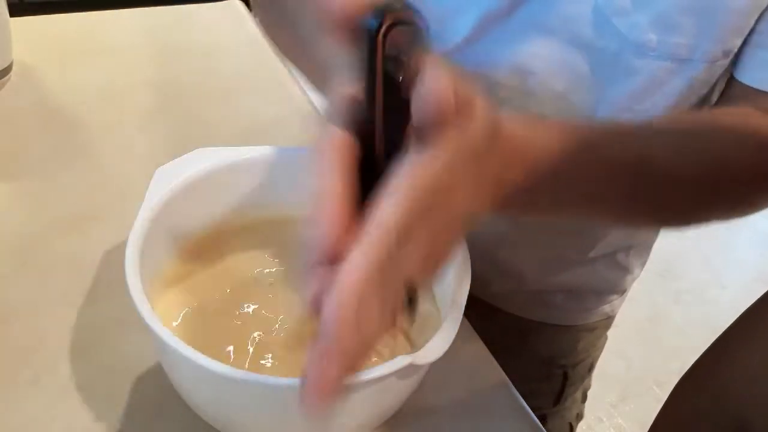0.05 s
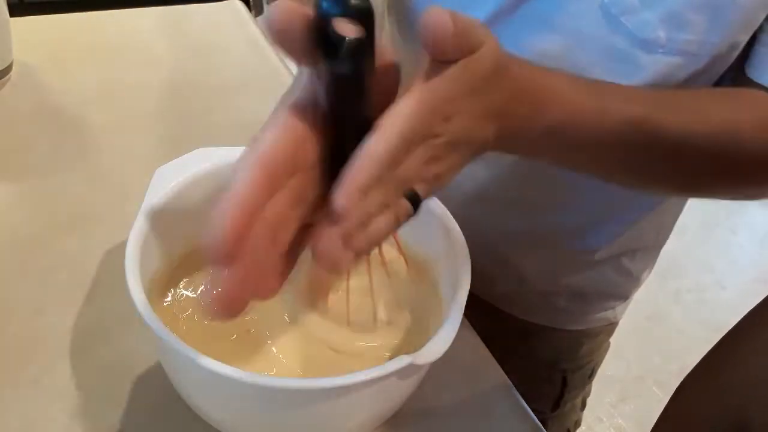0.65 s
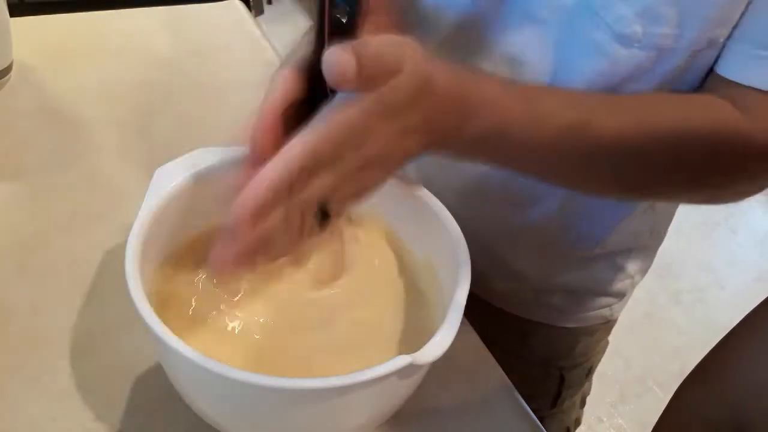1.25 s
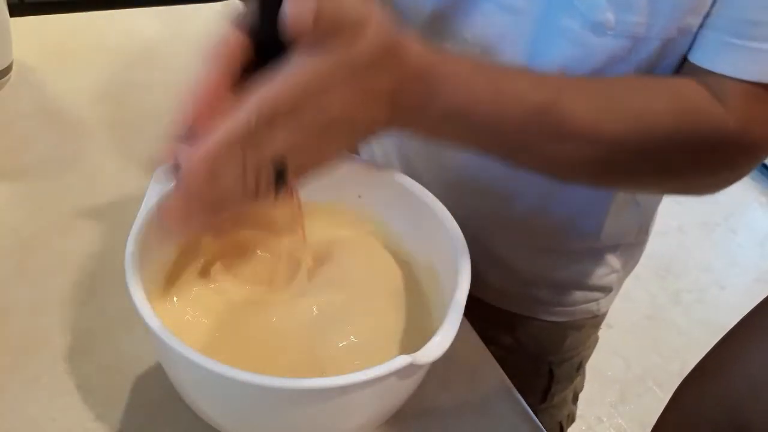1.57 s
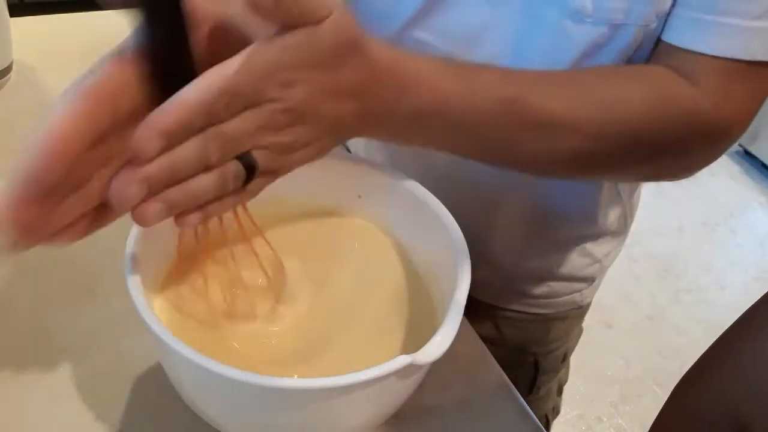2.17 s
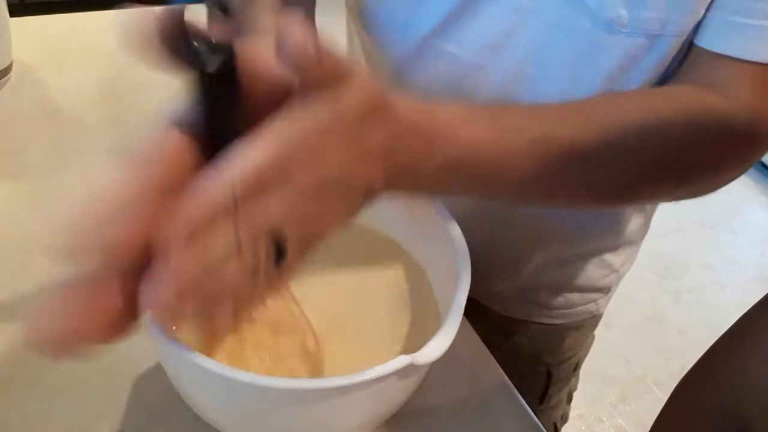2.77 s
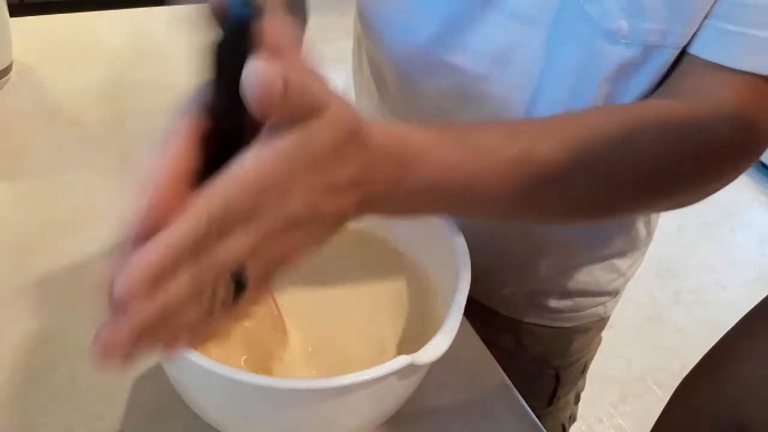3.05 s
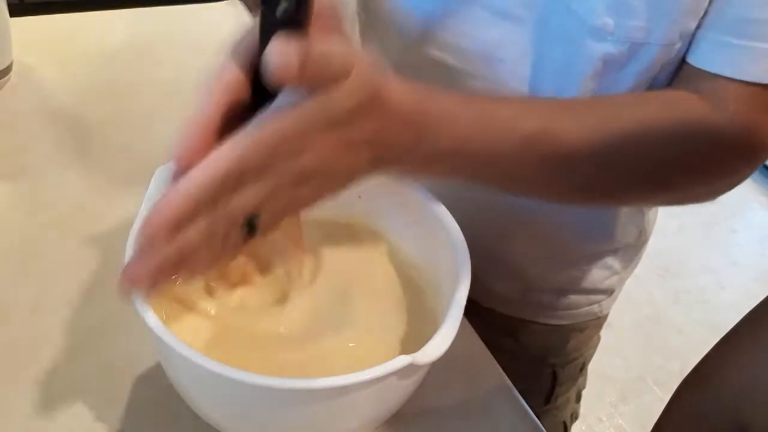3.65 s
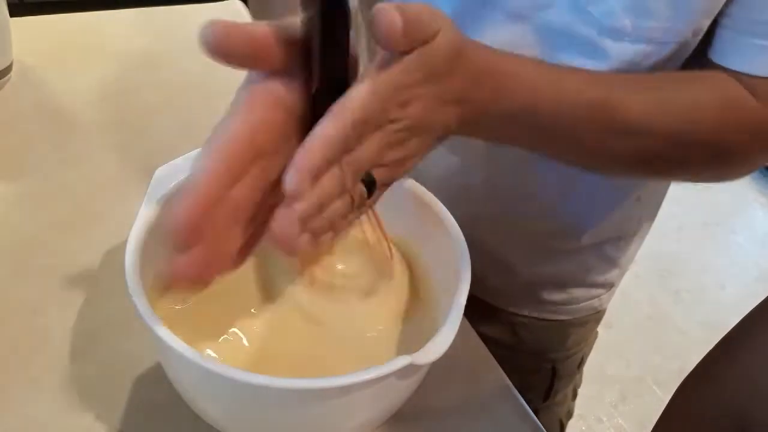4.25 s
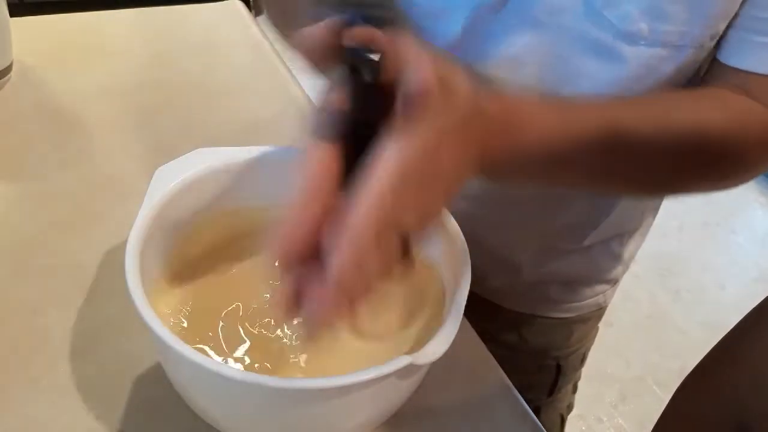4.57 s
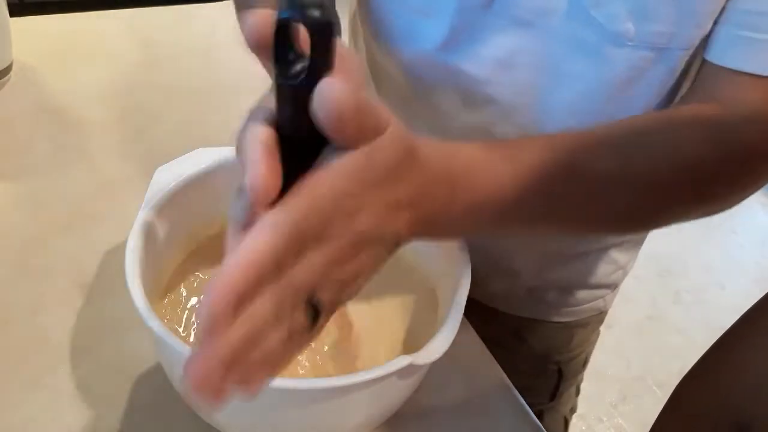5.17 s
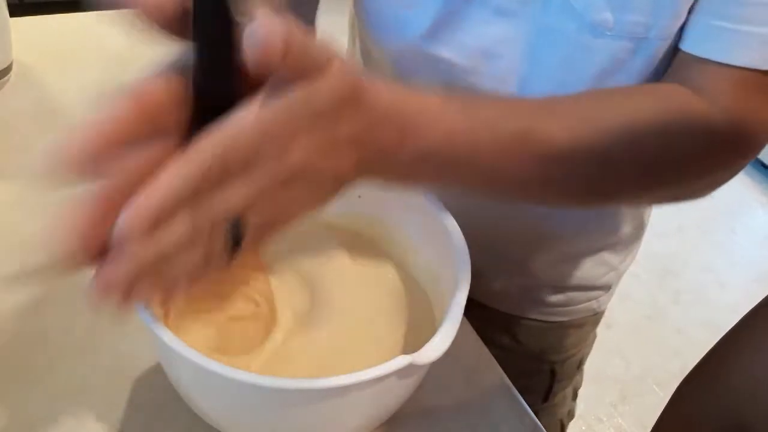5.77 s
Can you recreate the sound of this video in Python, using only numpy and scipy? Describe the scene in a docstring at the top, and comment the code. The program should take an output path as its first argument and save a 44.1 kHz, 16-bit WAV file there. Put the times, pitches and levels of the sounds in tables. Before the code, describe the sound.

Close by, thin batter churns as a whisk spins one way and then the other between rubbing palms. Wet crackles, plops and low gulps run throughout, growing busier after about a second, easing midway, then picking up again. Light, irregular clicks and short pings come from the wires touching the plastic bowl. A small kitchen adds a brief echo over a faint hush.

```python
"""A small kitchen: a wire whisk is twirled between two palms in a plastic bowl of thin batter.
The palms swish along the handle and the spin reverses between strokes. The wires churn the liquid,
which gulps over large air pockets, squelches, plops with trapped bubbles and crackles with tiny ones.
Now and then the wires ping or click against the bowl. Bowl and room echo over a faint hush."""
import sys
import numpy as np
from scipy import signal
from scipy.fft import rfft, irfft, next_fast_len
from scipy.io import wavfile
from scipy.ndimage import uniform_filter1d, map_coordinates

SR = 44100
rng = np.random.default_rng(int(sys.argv[2]) if len(sys.argv) > 2 else 0)


def generate_wav(signal):
    """Clip the signal to [-1, 1] and save it as 16-bit WAV at the path in sys.argv[1]."""
    frames = np.transpose(np.atleast_2d(signal))
    scaled = np.clip(frames, -1, 1) * 32767
    pcm = np.round(scaled).astype(np.int16)
    wavfile.write(sys.argv[1], SR, pcm)


N = 256651


def amp(db):
    return 10 ** (np.asarray(db) / 20)


def unit_rms(x):
    return x / np.sqrt(np.mean(x ** 2) + 1e-20)


def over_frequency(points, hz):
    """Interpolate (frequency, value) points on a log axis."""
    knots_hz, values = np.transpose(points)
    return np.interp(np.log(hz + 1), np.log(knots_hz + 1), values)


def over_time(points):
    """Interpolate (time, value) points to every sample."""
    return np.interp(np.arange(N) / SR, *np.transpose(points))


def wobble(rate_hz):
    """Smooth random curve, rate_hz knots a second."""
    knots = rng.standard_normal(int(N * rate_hz / SR) + 4)
    return map_coordinates(knots, [np.arange(N) * rate_hz / SR])


def filtered(x, response):
    """Apply a complex frequency response."""
    size = next_fast_len(N + SR // 2)
    return irfft(rfft(x, size) * response(np.fft.rfftfreq(size, 1 / SR)), size)[..., :N]


def coloured(x, spectrum):
    """Shape x by a spectrum; rms 1."""
    return unit_rms(filtered(x, lambda hz: amp(over_frequency(spectrum, hz))))


def noise(spectrum):
    return coloured(rng.standard_normal(N), spectrum)


def stereo_noise(spectrum, direct_share, left_lead_s=0.00009):
    """Broad source: one share arrives straight, left first; the rest is scattered."""
    advance_s = np.array([[0.5], [-0.5]]) * left_lead_s
    direct = filtered(noise(spectrum), lambda hz: np.exp(2j * np.pi * hz * advance_s))
    scattered = np.array([noise(spectrum), noise(spectrum)])
    return np.sqrt(direct_share) * direct + np.sqrt(1 - direct_share) * scattered


def add(track, start_s, sound):
    i = max(round(start_s * SR), 0)
    track[i:i + len(sound)] += sound[:max(N - i, 0)]


def ring(t, hz, t60_s, rise, onset_cycles=1.0):
    """Damped tone: swells over its first cycles, climbs in pitch like a bubble nearing the surface."""
    t60_s = np.maximum(t60_s, 0.001)
    envelope = (1 - np.exp(-(t * hz / onset_cycles) ** 2)) * amp(-60 * t / t60_s)
    phase = 2 * np.pi * hz * t * (1 + rise * np.minimum(t / t60_s, 1) / 2)
    return envelope / envelope.max(axis=-1, keepdims=True) * np.sin(phase)


def froth(centre_hz, log_spread, cycles, count):
    """Crowd of tiny random bubbles, quickly damped by the batter; rms 1."""
    t = np.arange(SR // 80) / SR
    starts = rng.integers(0, N, (count, 1))
    hz = np.clip(centre_hz * np.exp(log_spread * rng.standard_normal((count, 1))), 500, 14000)
    gains = amp(6 * np.minimum(rng.exponential(size=(count, 1)), 2.6))
    grains = gains * ring(t, hz, cycles / hz, rise=0.2, onset_cycles=1.5)
    positions = starts + np.arange(len(t))
    return unit_rms(np.bincount(positions.ravel(), grains.ravel(), minlength=N)[:N])


# Still-room spectrum: (frequency [Hz], gain [dB])
HUSH_SPECTRUM = [(25, -24), (55, 8), (100, 13), (200, -19), (400, 1.5), (800, -2), (1300, -39.5),
                 (3000, -49), (7000, 1.5), (9000, -8), (16000, -7.5)]
def room_hush(gain_db=-69):
    """Steady, faint room noise."""
    return amp(gain_db) * stereo_noise(HUSH_SPECTRUM, direct_share=0.51)


# Kitchen decay: (frequency [Hz], T60 [s])
ROOM_T60 = [(100, 0.29), (500, 0.95), (2000, 0.48), (7000, 0.25), (15000, 0.35)]
def room_reverb(x):
    """Diffuse tail, each frequency dying at its own rate."""
    hz, age_s, bins = signal.stft(rng.standard_normal((2, SR // 2)), SR, nperseg=256)
    decay = amp(-60 * age_s / over_frequency(ROOM_T60, hz)[:, None])
    tail = signal.istft(bins * decay, SR, nperseg=256)[1]
    delayed = np.pad(x, (SR // 170, 0))
    return signal.fftconvolve(delayed[None], tail / np.linalg.norm(tail[0]), axes=1)[:, :N]


def early_reflections(x, gain_db=-4, t60_s=0.045, gap_s=0.0008, blocks=48):
    """Echoes off bowl wall, counter and body; new random paths per block as the whisk moves."""
    echoes, t = np.zeros((2, N + SR)), np.arange(SR // 30) / SR
    hop = N // blocks + 1
    decay = amp(-60 * t / t60_s) * (t > gap_s)
    for i in range(0, N, hop):
        paths = unit_rms(rng.standard_normal((2, len(t))) * decay) / np.sqrt(len(t))
        echo = signal.fftconvolve(x[None, i:i + hop], paths, axes=1)
        echoes[:, i:i + echo.shape[1]] += echo
    return amp(gain_db) * echoes[:, :N]


# Whisk drift across the bowl: (time [s], left-channel lead [s])
LEFT_LEAD = [(0, 0.000075), (1.2, 0.000039), (2, .00013), (3.7, 0.00016), (4.7, 0.000054), (5.82, 0.00013)]
def direct_path(x):
    """The left-right path difference follows the whisk's position."""
    shift = SR * over_time(LEFT_LEAD) / 2
    return np.array([map_coordinates(x, [np.arange(N) + side * shift], order=5) for side in (1, -1)])


# Twirls, each a push then a pull: (start [s], push level [dB], pull level [dB])
PALM_TWIRLS = [(-0.02, -62, -64.5), (0.238, -62, -62), (0.495, -66, -62), (0.756, -70, -65),
               (1.012, -65, -65.5), (1.252, -65.5, -63.5), (1.498, -60.5, -63.5), (1.768, -62.5, -62),
               (2.039, -61.5, -57), (2.3, -69, -64), (2.568, -68.5, -65.5), (2.823, -65, -62),
               (3.083, -65.5, -61), (3.348, -69, -59.5), (3.616, -63.5, -64), (3.865, -63.5, -60.5),
               (4.116, -62.5, -63.5), (4.383, -70.5, -65.5), (4.663, -57.5, -61.5), (4.873, -65.5, -60),
               (5.138, -73, -63.5), (5.407, -63, -62.5), (5.627, -65.5, -66.5), (5.88, -66, -66)]
def hand_motion(push_share=0.55, skew=0.68, shape=0.89):
    """Palm speed (0 at each reversal, peak 1) and rub level; skew below 1 peaks a stroke early."""
    starts_s, push_db, pull_db = np.transpose(PALM_TWIRLS)
    turns_s = starts_s[:-1] + push_share * np.diff(starts_s)
    reversals_s = np.sort(np.concatenate([starts_s, turns_s]))
    stroke = np.interp(np.arange(N) / SR, reversals_s, np.arange(len(reversals_s)))
    speed = np.abs(np.sin(np.pi * (stroke % 1) ** skew)) ** shape
    stroke_db = np.column_stack([push_db, pull_db]).ravel()
    return speed, uniform_filter1d(stroke_db[stroke.astype(int)], size=1200)


# Skin friction spectrum: (frequency [Hz], gain [dB])
SKIN_SPECTRUM = [(200, 2), (700, 0), (1500, 4), (3000, 1.5), (5000, 5.5), (7300, 6), (8500, -6.5),
                 (12500, -2), (16000, -6)]
def palms(gain_db=8, fizz_db=-6, reversal_share=0.099):
    """Skin rubs the handle and wires cut the foam; both ebb at each reversal."""
    speed, level_db = hand_motion()
    effort = amp(level_db + gain_db) * (reversal_share + (1 - reversal_share) * speed)
    rub = unit_rms(stereo_noise(SKIN_SPECTRUM, direct_share=0.25) * amp(1.5 * wobble(120)))
    fizz = froth(centre_hz=4000, log_spread=0.35, cycles=12, count=1100)
    return effort * rub, effort * amp(fizz_db) * fizz


# Wire-on-plastic spectrum: (frequency [Hz], gain [dB])
CLICK_SPECTRUM = [(600, -18), (2000, 1.5), (4000, 5.5), (7300, -2), (8800, -5.5), (16000, -8.5)]
# Whisk hits on the bowl: (time [s], relative level [dB])
BOWL_HITS = [(0.1815, -28.5), (0.3173, -35), (0.477, -25.5), (0.7961, -32), (0.896, -38.5), (0.9652, -41.5),
             (1.0788, -34), (1.736, -33.5), (1.987, -33), (2.001, -23.5), (2.0582, -30.5), (2.0874, -32),
             (2.3234, -36), (2.4679, -35), (3.2391, -30.5), (3.384, -35), (3.53, -32), (3.6711, -24),
             (3.7412, -34), (3.9851, -36), (4.0833, -33), (4.278, -45), (4.55, -40), (4.702, -32),
             (4.715, -24.5), (4.7705, -32), (4.8266, -26.5), (5.4703, -39.5), (5.7837, -27)]
def clicks(strike_db=-6, scrape_db=-20, strike_t60_s=0.0096, scrape_t60_s=0.13):
    """A wire hits the wet plastic, is damped at once, then scrapes briefly."""
    envelope, t = np.zeros(N), np.arange(SR // 10) / SR
    strike = amp(strike_db - 60 * t / strike_t60_s)
    scrape = amp(scrape_db - 60 * t / scrape_t60_s)
    for start_s, db in BOWL_HITS:
        add(envelope, start_s, amp(db) * (strike + scrape))
    return envelope * noise(CLICK_SPECTRUM)


# Sloshing spectrum: (frequency [Hz], gain [dB])
SLOSH_SPECTRUM = [(130, -32), (260, -4), (450, -11.5), (800, -10), (1400, -14), (4000, -30)]
# Large air pockets: (time [s], pitch [Hz], relative note level [dB], relative surge level [dB])
AIR_POCKETS = [(0.2, 164, -57, -50.5), (0.46, 181, -59, -56), (0.696, 187, -46, -58),
               (0.75, 192, -57, -58.5), (0.95, 184, -52, -51.5), (1.202, 172, -46, -50),
               (1.241, 234, -49.5, -53), (1.474, 193.5, -44, -45), (1.733, 161, -63, -46.5),
               (1.97, 201, -65, -45.5), (2.239, 170, -51.5, -50.5), (2.505, 178.5, -38, -51.5),
               (2.515, 424, -50.5, -69), (2.766, 178, -44, -58), (3.028, 179.5, -45.5, -55.5),
               (3.44, 185, -56.5, -65), (3.54, 183, -51.5, -64), (3.686, 180, -47, -54.5),
               (3.818, 254, -56, -54.5), (4.072, 190, -57.5, -52.5), (4.326, 184, -54, -58),
               (4.825, 203, -58, -51.5), (5.088, 170, -49, -51.5), (5.392, 189.5, -49.5, -57),
               (5.726, 130, -57, -54)]
def gulps(note_db=-1, t60_s=0.099, slosh_db=1, slosh_s=0.017):
    """Large air pockets ring low and soft as the batter sloshes shut over them."""
    notes, flow, t = np.zeros(N), np.zeros(N), np.arange(SR // 5) / SR
    for start_s, hz, db, surge_db in AIR_POCKETS:
        add(notes, start_s, amp(db + note_db) * ring(t, hz, t60_s, rise=0.093, onset_cycles=1.33))
        add(flow, start_s, amp(surge_db + slosh_db) * t / slosh_s * np.exp(-t / slosh_s))
    return notes + flow * noise(SLOSH_SPECTRUM)


def surges(rise_s=0.017, fall_s=0.066, lag_s=0.0088):
    """Envelope of batter motion: builds just before each gulp, settles after it."""
    t, power = np.arange(N) / SR, np.zeros(N)
    for start_s, _, _, db in AIR_POCKETS:
        age_s = t - start_s - lag_s
        envelope = np.exp(-np.maximum(age_s / fall_s, -age_s / rise_s))
        power += (amp(db) * envelope) ** 2
    return np.sqrt(power)


# Heaving batter spectrum: (frequency [Hz], gain [dB])
HEAVE_SPECTRUM = [(25, -44), (45, -27), (62, -10.5), (82, -9), (100, 3), (122, -3), (148, -13), (185, -3.5),
                  (240, -15), (310, -16.5), (420, -28), (700, -23), (1500, -53)]
def heave(surge, gain_db=-3, floor_db=-63):
    """The stirred batter heaves in the bass, swelling with each surge."""
    return amp(gain_db) * np.hypot(amp(floor_db), surge) * noise(HEAVE_SPECTRUM)


# Splash spectrum: (frequency [Hz], gain [dB])
SPLASH_SPECTRUM = [(250, -4.5), (500, -7.5), (900, -3), (1400, 2), (2400, 4.5), (4000, 2), (7000, -22),
                   (9000, -27), (16000, -33)]
# Churning effort: (time [s], relative level [dB])
CHURN_EFFORT = [(0.0, -71), (0.53, -80), (0.92, -65.5), (1.57, -52.5), (1.75, -60), (2.11, -55),
                (2.56, -66), (3.45, -82), (3.87, -57), (4.16, -57.5), (4.41, -90), (4.63, -67), (4.9, -53),
                (5.09, -59), (5.74, -69), (5.82, -49)]
def churn(surge, grain_db=-4, plop_db=-12, wash_db=-10, surge_db=-11, swing=1.02, reversal_share=0.36):
    """Wires churn the surface: mono crackle and stereo wash follow effort, hand speed and surges."""
    effort_db = over_time(CHURN_EFFORT)
    effort = amp(effort_db.mean() + swing * (effort_db - effort_db.mean()))
    speed, _ = hand_motion()
    stirring = effort * (reversal_share + (1 - reversal_share) * speed)
    drive = np.hypot(stirring, amp(surge_db) * surge)
    grains = froth(centre_hz=1800, log_spread=0.65, cycles=7, count=3000)
    plops = froth(centre_hz=2307, log_spread=0.42, cycles=32, count=170)
    crackle = amp(grain_db) * coloured(grains, SPLASH_SPECTRUM) + amp(plop_db) * plops
    wash = unit_rms(stereo_noise(SPLASH_SPECTRUM, direct_share=0.4) * amp(3.5 * wobble(70)))
    return drive * crackle, drive * amp(wash_db) * wash


# Wire slaps through the surface: (time [s], relative level [dB])
SURFACE_SLAPS = [(0.202, -38), (1.331, -33), (1.481, -31), (1.579, -30.5), (1.699, -29), (1.728, -33),
                 (1.843, -36), (1.958, -32), (2.116, -39.5), (2.244, -28.5), (2.521, -38), (2.763, -36),
                 (3.003, -40.5), (3.437, -31), (3.665, -27.5), (3.837, -36.5), (4.799, -26.5), (4.831, -33),
                 (4.887, -35), (5.722, -33.5)]
def squelches(centre_hz=1646, log_spread=0.34, cycles=10, count=30, cluster_s=0.04, fade_db=17,
              pop_db=-10, tear_db=-21, tear_t60_s=0.12):
    """A slap tears the batter: sticky crackle and a bubble cluster, densest and loudest at first."""
    pops, tears, t = np.zeros(N), np.zeros(N), np.arange(SR // 10) / SR
    jitters = rng.random((len(SURFACE_SLAPS), count))
    scatter = np.clip(rng.standard_normal(jitters.shape), -2, 2)
    clusters_hz = centre_hz * np.exp(log_spread * scatter)
    for (start_s, db), jitter, pitches_hz in zip(SURFACE_SLAPS, jitters, clusters_hz):
        add(tears, start_s, amp(db + tear_db - 60 * t / tear_t60_s))
        lateness = ((np.arange(count) + jitter) / count) ** 2
        for late, hz in zip(lateness, pitches_hz):
            pop = ring(t[:SR // 40], hz, cycles / hz, rise=0.18, onset_cycles=0.95)
            add(pops, start_s + cluster_s * late, amp(db + pop_db - fade_db * late) * pop)
    return pops + tears * froth(centre_hz=3300, log_spread=0.24, cycles=10.5, count=5000)


# Onset snap spectrum: (frequency [Hz], gain [dB])
SNAP_SPECTRUM = [(400, -2), (1200, 3), (3000, 9), (5000, -8), (7300, 26), (8800, 11), (16000, -6)]
# Bubble plops and wire pings: (time [s], pitch [Hz], relative level [dB])
PLOPS_AND_WIRE_PINGS = [(0.1831, 2670, -32), (0.3163, 6620, -17), (0.3211, 7480, -20), (0.471, 1690, -30.5),
                        (0.48, 3960, -27.5), (0.5215, 1663, -24.5), (0.6341, 3285, -37), (0.896, 3260, -50),
                        (0.965, 6120, -30.5), (1.077, 1500, -40.5), (1.315, 3240, -37.5),
                        (1.3306, 908, -45), (1.3753, 1326, -31), (1.5799, 2150, -42), (1.699, 2370, -34),
                        (1.7534, 1124, -41.5), (1.8429, 1030, -37), (1.9714, 940, -40),
                        (1.991, 3870, -28.5), (2.004, 2095, -26.5), (2.1975, 1350, -43.5),
                        (2.2436, 1560, -47), (2.4678, 1980, -43.5), (2.5201, 1700, -37),
                        (2.6382, 2130, -41.5), (3.0024, 2190, -33.5), (3.0136, 4120, -36.5),
                        (3.15, 2660, -39), (3.2357, 1900, -39.5), (3.281, 1636, -39), (3.382, 1620, -31),
                        (3.4383, 930, -46), (3.5311, 6600, -36), (3.6661, 1130, -41), (3.665, 2380, -24.5),
                        (3.7002, 1433, -23), (3.785, 4800, -39.5), (3.8371, 963, -40), (3.858, 1355, -41.5),
                        (3.9848, 4070, -33), (4.04, 1860, -40), (4.137, 5600, -35), (4.2777, 1475, -43),
                        (4.297, 6430, -35.5), (4.315, 2660, -39), (4.7, 5550, -27), (4.7163, 3215, -23),
                        (4.7231, 2990, -25.5), (4.8043, 1230, -33.5), (4.8326, 1730, -26.5),
                        (4.8893, 804, -45.5), (4.905, 3200, -39), (5.0175, 1820, -32.5),
                        (5.0955, 2330, -38), (5.266, 2250, -37), (5.327, 3730, -32.5), (5.408, 1253, -44),
                        (5.489, 2900, -41.5), (5.7412, 1950, -36), (5.784, 4400, -30.5)]
def plops_and_pings(cycles=54, snap_db=-20, snap_t60_s=0.013, snap_db_per_octave=2.5, waver_s=0.00009):
    """Bubble plops and short pings of the whisk wires, each a snap then a brief, wavering ring."""
    rings, snaps, t = np.zeros(N), np.zeros(N), np.arange(SR // 10) / SR
    for start_s, hz, db in PLOPS_AND_WIRE_PINGS:
        add(rings, start_s, amp(db) * ring(t, hz, cycles / hz, rise=0.013))
        tilt_db = snap_db_per_octave * np.log2(hz / 1100)
        add(snaps, start_s, amp(db + snap_db + tilt_db - 60 * t / snap_t60_s))
    wavering = map_coordinates(rings, [np.arange(N) + SR * waver_s * wobble(260)])
    return wavering + snaps * noise(SNAP_SPECTRUM)


def spatter(shed_db=-14, count=7, cycles=14, within_s=0.016,
            burst_db=-19, burst_t60_s=0.071, burst_below_hz=2600):
    """Faint bubbles of nearby pitch follow each plop or ping; liquid collapses round the deep ones."""
    shed, bursts, t = np.zeros(N), np.zeros(N), np.arange(SR // 10) / SR
    chance = rng.random((len(PLOPS_AND_WIRE_PINGS), count, 3))
    for (start_s, parent_hz, db), draws in zip(PLOPS_AND_WIRE_PINGS, chance):
        for late, detune, gain in draws:
            hz = parent_hz * 2 ** (1.4 * detune - 0.6)
            pop = ring(t[:SR // 40], hz, cycles / hz, rise=0.14)
            add(shed, start_s + within_s * late ** 2, amp(db + shed_db) * gain * pop)
        if parent_hz < burst_below_hz:
            add(bursts, start_s, amp(db + burst_db - 60 * t / burst_t60_s))
    return shed + bursts * unit_rms(noise(SPLASH_SPECTRUM) * amp(wobble(350)))


def scene(room_send_db=-9, bass_send_db=-15, left_db=1, right_db=-1.5):
    """Bowl and hands close by, slightly louder on the left, over the room's hush."""
    surge = surges()
    crackle, wash = churn(surge)
    swell = heave(surge)
    rub, fizz = palms()
    bass = swell + gulps()
    whisking = plops_and_pings() + squelches() + spatter() + clicks() + crackle + fizz
    reverb = room_reverb(amp(room_send_db) * (whisking + rub[0]) + amp(bass_send_db) * bass)
    background = room_hush() + reverb + early_reflections(whisking)
    foreground = direct_path(bass + whisking) + rub + wash
    return (background + foreground) * amp([[left_db], [right_db]])


def record(dry, cutoff_hz=16100):
    """Brick-wall low-pass."""
    return filtered(dry, lambda hz: hz < cutoff_hz)


dry = scene()
out = record(dry)
generate_wav(out)
```